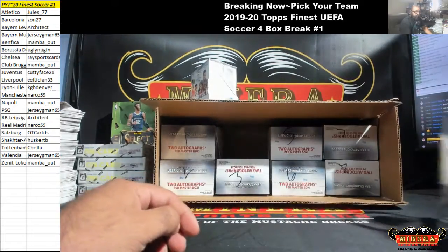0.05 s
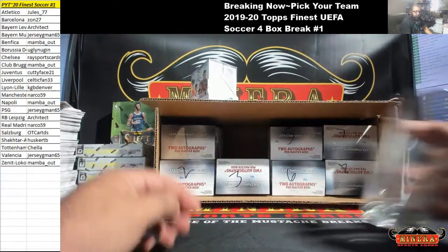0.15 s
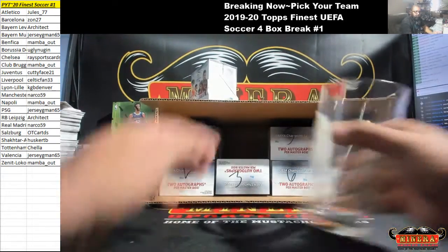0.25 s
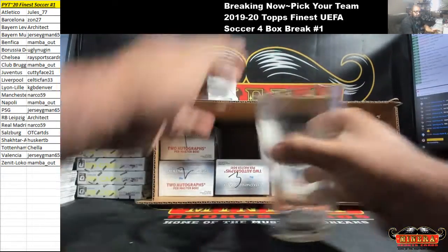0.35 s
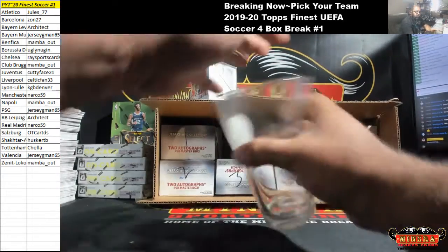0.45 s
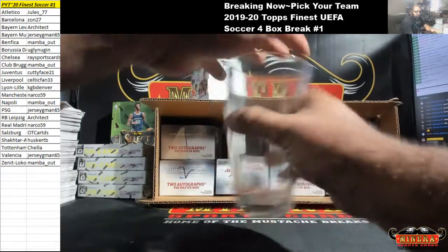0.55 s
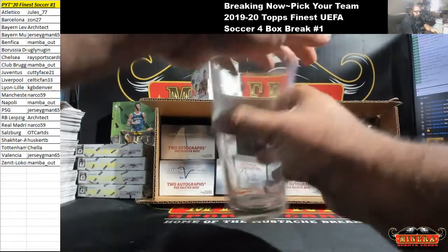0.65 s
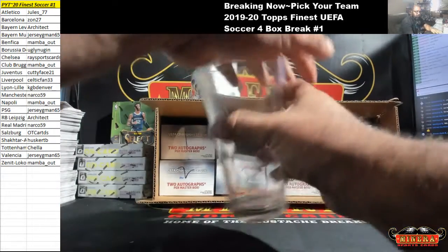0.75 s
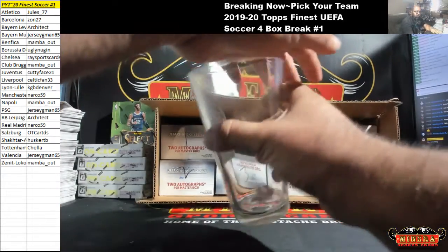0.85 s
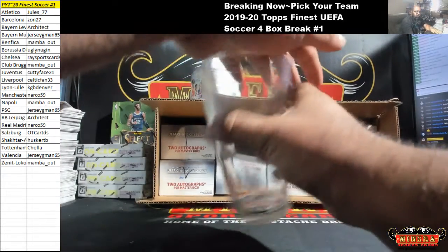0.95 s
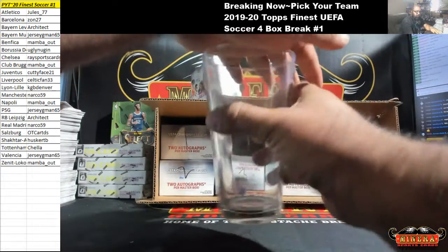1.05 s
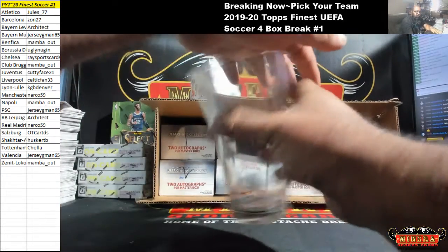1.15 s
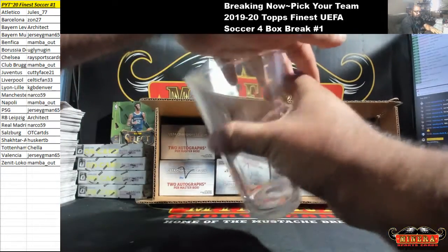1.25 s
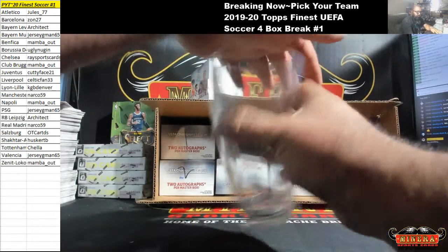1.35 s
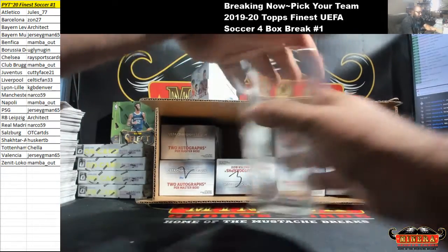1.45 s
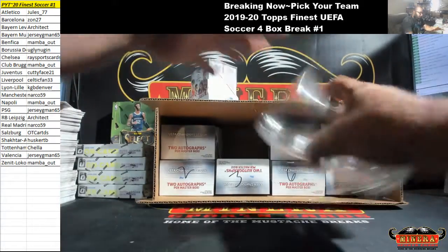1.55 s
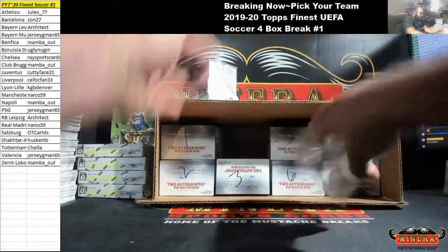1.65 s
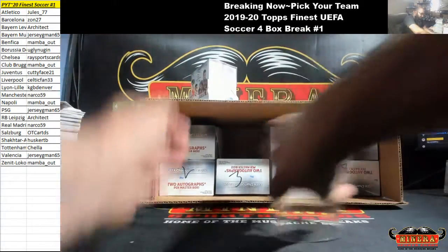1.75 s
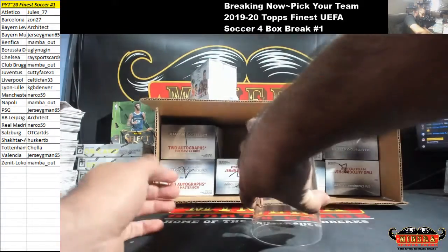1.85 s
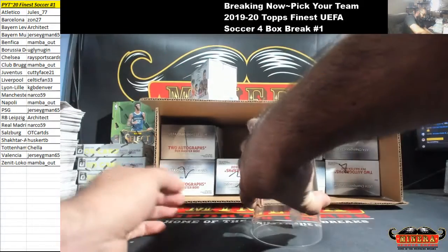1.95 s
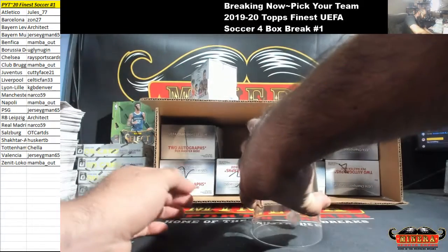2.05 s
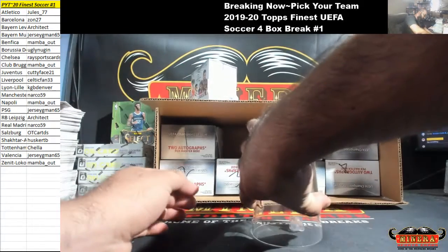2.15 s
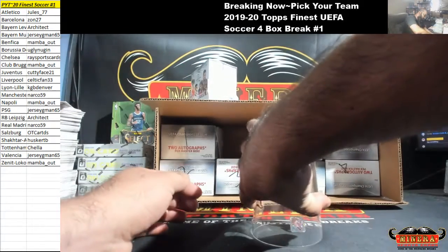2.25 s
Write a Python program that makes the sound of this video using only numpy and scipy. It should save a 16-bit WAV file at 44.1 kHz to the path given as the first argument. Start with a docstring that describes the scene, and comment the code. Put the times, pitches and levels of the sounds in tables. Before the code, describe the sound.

Rapid bright ringing rattle of a die shaken in a plastic cup, ending in a clink and thud

```python
"""Bright, glassy rings come about twenty times a second: a die shaken in a hard clear plastic cup under a palm.
Each wall hit is a cluster of decaying sines with a noise clack; dry base cracks join from 0.36 s, some in pairs.
The cup is then put down on a padded table: noise knocks, a deep sine sway of the microphone stand, and the
die bounces to rest. Rumble, hand rub, air waft and room noise are coloured noise; the small room is decaying
noise echoes."""
import sys
import numpy as np
from scipy import signal
from scipy.fft import rfft, irfft
from scipy.io import wavfile

SR = 44100
rng = np.random.default_rng(int(sys.argv[2]) if len(sys.argv) > 2 else 0)


def int16_out(signal):
    """Quantize to a 16-bit WAV file."""
    q = np.round(np.clip(np.atleast_2d(signal).T, -1, 1) * 32767)
    wavfile.write(sys.argv[1], SR, q.astype(np.int16))


N = 103635
T = np.arange(N) / SR
AGE = T[:SR // 5]   # seconds since a blow; every blow and echo is cut at 0.2 s

# Noise colours, relative within each table: hz [Hz], density_db [dB per Hz]
ROOM_NOISE = [(60,0),(130,0),(300,-13),(900,-14),(2000,-25),(5000,-42),(14000,-62)]
# Hands rubbing on the cup: hz [Hz], density_db [dB per Hz]
HANDLING = [(100,-11),(500,-17.5),(1000,-0.5),(3000,-7.5),(9000,-3),(14000,-44.5)]
# Air pushed against the microphone as the arms come down: hz [Hz], density_db [dB per Hz]
WAFT = [(11,8.5),(25,-14.5),(60,-40)]
# Loudness curve of the waft: time_s [s], level_db [dB]
WAFT_LEVEL = [(1.1,-41.5),(1.4,-14),(1.6,-21),(1.95,-12),(2.35,-32)]
# Low rumble of the table and microphone stand: hz [Hz], density_db [dB per Hz]
RUMBLE = [(30,2.5),(48,3.5),(65,0.5),(85,-22),(160,-28)]
# Loudness curve of the rumble: time_s [s], level_db [dB]
RUMBLE_LEVEL = [(0,-27),(0.14,-34.5),(0.22,-40),(0.38,-43),(0.46,-31.5),(0.75,-38),(0.98,-42),(1.24,-40),(1.6,-38),(1.85,-25.5),(2.05,-34.5),(2.35,-31)]
# Thud of a knock on the table: hz [Hz], density_db [dB per Hz]
KNOCK_COLOUR = [(40,6),(130,-2.5),(220,-4.5),(450,-14),(800,-24),(2000,-43)]
# Cup and hand knocking on the table: start_s [s], level_db [dB]
KNOCKS = [(1.722,-23.5),(1.802,-21.5),(1.956,-29.5),(2.06,-41.5)]
# Die bouncing in the cup as it lands: start_s [s], level_db [dB], lowpass_hz [Hz]
LANDINGS = [(1.7679,-28,8180),(1.7961,-3.5,15000),(1.8205,-30,9200),(1.8576,-9.5,3800),(1.9386,-17,4470)]
# Die on the base, some in close pairs: start_s [s], level_db [dB], air_hz [Hz], resonance of the part-covered cup
BASE_HITS = [(0.3645,-28,663),(0.3799,-18.5,657),(0.535,-24,669),(0.545,-20.5,643),(0.7087,-23,554),(0.8688,-27.5,578),(1.0119,-25,520),(1.1233,-22,513),(1.2443,-22,545),(1.3672,-24,610),(1.5255,-20,656),(1.6984,-20,625)]
# Die on the wall: start_s [s], then levels before the trims below:
# main_db [dB], low_db [dB], top_db [dB], contact_db [dB]
WALL_HITS = [(0.0014, -11.5, -34.5, -21, -22), (0.0945, -7, -28.5, -27.5, -22.5),
             (0.1928, -11.5, -36.5, -31, -25), (0.2332, -8, -31.5, -34, -22), (0.2603, -7.5, -42, -27, -26),
             (0.2884, -15, -37, -34, -22), (0.3157, -1.5, -29.5, -28, -23), (0.354, -4.5, -34, -28, -25),
             (0.3964, -3, -37, -56, -21.5), (0.4304, -8.5, -29, -24, -26.5),
             (0.471, -2.5, -31, -17.5, -21.5), (0.493, -4, -37.5, -18, -22.5), (0.5503,-9.5,-45,-28,-22),
             (0.5588, -12.5, -49, -30, -23.5), (0.5801, -2, -25.5, -29, -23), (0.5911, -1, -26, -27, -26),
             (0.6054, -9.5, -38, -17, -20), (0.6335, -11, -25.5, -18.5, -20.5), (0.6624, -7, -27, -29, -27),
             (0.735, -9.5, -37, -55, -27.5), (0.7818, -15, -31.5, -53, -61),
             (0.822, -6, -37.5, -20.5, -25.5), (0.8525, -3.5, -31, -63, -23),
             (0.884, -12.5, -66, -75.5, -25.5), (0.9497, -1.5, -24.5, -13.5, -17),
             (0.9893, -1, -25, -16.5, -17.5), (1.072, -4.5, -26.5, -14, -20),
             (1.1335, -7.5, -33, -69.5, -18.5), (1.1508, -10, -34, -44, -37),
             (1.2083, -12.5, -32, -50, -27.5), (1.261, -3.5, -29.5, -57.5, -23.5),
             (1.3241, -6.5, -31, -31.5, -23), (1.3468, -6, -27.5, -54.5, -28.5),
             (1.3981, -6, -29, -53.5, -23), (1.4277, -7.5, -36, -28.5, -25),
             (1.485, -11.5, -58, -45, -25.5), (1.5613, -11.5, -43, -51, -32),
             (1.6231, -8.5, -35, -60, -25.5), (1.6525, -7, -36, -74, -28),
             (1.7468, -13.5, -31.5, -38.5, -29), (1.7674, -11.5, -28, -29.5, -20.5)]
# Clack of die on wall: hz [Hz], density_db [dB per Hz]
CLACK = [(300,-8.5),(1200,-12),(2400,-6.5),(4200,3.5),(7000,2),(9000,-2),(12500,-14),(14000,-33.5)]
# Clack of die on base: hz [Hz], density_db [dB per Hz]
BASE_CLACK = [(300,-46),(1100,-31),(1800,-1),(4000,0.5),(7500,5),(11000,-6.5),(13500,-14),(16000,-29.5)]
# Held cup, low ring: pitch_hz [Hz], level_db [dB], t60_s [s]
LOW_MODES = [(2052,-2,.17),(2085,-10,.06)]
# Held cup, middle ring heard within the clack: pitch_hz [Hz], level_db [dB], t60_s [s]
MID_MODES = [(3120,-9,.04),(3690,-7,.055),(4240,-3,.05),(4520,-8,.035),(8500,0,.05)]
# Held cup, main ring: pitch_hz [Hz], level_db [dB], t60_s [s], before any length factor
MAIN_MODES = [(5480,-17,.035),(5600,-10,.05),(5706,-3,.07),(5770,-10,.022),(6090,-23,.06)]
# Held cup, top ring: pitch_hz [Hz], level_db [dB], t60_s [s]
TOP_MODES = [(11450,-6,.022),(11560,-8,.055),(12530,-4,.045),(12700,-6,.015)]
# Base of the held cup: pitch_hz [Hz], level_db [dB], t60_s [s]
BASE_MODES = [(1510,-21.5,0.042),(2950,-21.5,0.019),(7800,-12.5,0.034),(10920,-10.5,0.09),(15500,-16,0.066)]
# Cup standing on the table: pitch_hz [Hz], level_db [dB], t60_s [s], before the length factor
STANDING_MODES = [(2020,-15,.09),(2075,-11,.09),(2945,-26,.08),(4605,-7,.065),(5690,-22,.2),(7650,-15,.13),(7850,-7,.08),(8535,-12,.09),(11540,-23,.09),(11900,-23,.08),(12580,-20,.09),(13080,-21,.1)]

FLOOR_DB, HANDLING_DB, HANDLING_END_S = -51, -50.5, 1.57
SWAY_S, SWAY_HZ, SWAY_DB = 1.722, 31.86, -3.5
SWAY_RISE_S, SWAY_HOLD_S, SWAY_FALL_S = 0.048, 0.017, 0.12
KNOCK_RISE_S, KNOCK_T60_S = 0.0023, 0.12
SKITTER_PER_S, SKITTER_DB, SKITTER_END_S = 70, -27, 1.5   # mean rate of grazing touches
CLACK_T60_S, BASE_T60_S, LANDING_T60_S = 0.02, 0.027, 0.011
CRACK_DB, BASE_CRACK_DB, CRACK_T60_S = 6.5, 9.5, 0.0039   # the first instant of contact
RING_DB, MID_DB, TOP_DB, CLACK_DB = 1, -3, 0.5, 1.5   # trims on the parts of a wall hit
BASE_CLACK_DB, LANDING_CLACK_DB = -1.5, -3.5
AIR_DB, AIR_T60_S = -17, 0.08
RING_LENGTH, STANDING_LENGTH = 0.92, 0.78   # factors on ring times: cup in the hand, cup on the table
CLEAN_BLOW_SUSTAIN = 0.14   # brighter blows ring longer: dB of ring time per dB of top ring
ATTACK_S, STRIKE_SPREAD_DB = 0.00077, 2.5   # ring onset time constant; spread of mode levels
DETUNE = 0.0038   # spread of each mode's pitch from blow to blow, as a share
WAVER, WAVER_S = 0.0034, 0.0038   # share by which a ring's pitch wanders, and the time of each step
EARLY_DB, EARLY_T60_S, FIRST_ECHO_S = -10.5, 0.064, 0.0048
ROOM_DB, ROOM_T60_S, ROOM_TREBLE_T60_S, ROOM_SPLIT_HZ = -8, 0.33, 0.32, 11000
CUTOFF_HZ = 16000


def from_db(db):
    """Decibels to gain."""
    return 10 ** (np.asarray(db) / 20)


def noise(spectrum):
    """Noise of rms 1 with the given colour, falling away beyond both ends."""
    hz, db = np.transpose(spectrum)
    f = np.maximum(np.arange(N // 2 + 1) * SR / N, 1)
    colour = from_db(np.interp(np.log(f), np.log(hz), db))
    skirts = (np.minimum(f / hz[0], 1) * np.minimum(hz[-1] / f, 1)) ** 2
    x = irfft(rfft(rng.standard_normal(N)) * colour * skirts, N)
    return x / x.std()


def fade(t60):
    """Exponential decay from a blow, 60 dB in t60 seconds."""
    return np.exp((-np.log(1000) / t60 * AGE).astype("f"))


def add(out, s, sound):
    """Mix a sound in at time s."""
    i = int(np.clip(s * SR, 0, N - 1))
    out[i:i + len(sound)] += sound[:N - i]


def burst(source, t60, rise_s=0.00024):
    """A decaying snatch of noise: the many short-lived modes of a contact."""
    i = rng.integers(N - len(AGE))
    return source[i:i + len(AGE)] * fade(t60) * (1 - np.exp(-AGE / rise_s))


def ring(modes, length=1):
    """One blow: mode balance and pitch vary at random from blow to blow, and each pitch wavers."""
    hz, db, t60 = np.transpose(modes)[:, :, None]
    strength, detune = rng.standard_normal((2, len(modes), 1))
    gain = from_db(db + STRIKE_SPREAD_DB * strength)
    # The balance shifts but the summed mode power stays put
    gain = gain * np.linalg.norm(from_db(db)) / np.linalg.norm(gain)
    steps = rng.standard_normal((len(modes), 200))
    pitch = hz * (1 + DETUNE * detune + WAVER * steps)
    step_index = (AGE / WAVER_S).astype(int)
    phase = np.cumsum(np.take(2 * np.pi * pitch / SR, step_index, axis=1), axis=1)
    partials = gain.astype("f") * fade(t60 * length) * np.sin(phase.astype("f"))
    return np.sum(partials, axis=0) * (1 - np.exp(-AGE / ATTACK_S))


def background():
    """Room noise, the soft rub of hands on the cup until it is put down, and the waft of the arms."""
    floor = from_db(FLOOR_DB) * noise(ROOM_NOISE)
    moving = np.interp(T, [HANDLING_END_S, HANDLING_END_S + 0.1], [1, 0])
    rub = from_db(HANDLING_DB) * moving * noise(HANDLING)
    waft = from_db(np.interp(T, *np.transpose(WAFT_LEVEL))) * noise(WAFT)
    return floor + rub + waft


def table_and_stand():
    """Dull knocks, a few deep swings of the microphone stand, and rumble from the moving arms."""
    out, thud = np.zeros(N), noise(KNOCK_COLOUR)
    for s, db in KNOCKS:
        add(out, s, from_db(db) * burst(thud, KNOCK_T60_S, KNOCK_RISE_S))
    corners = np.cumsum([0, SWAY_RISE_S, SWAY_HOLD_S, SWAY_FALL_S])
    swell = np.sin(np.pi / 2 * np.interp(AGE, corners, [0, 1, 1, 0])) ** 2
    add(out, SWAY_S, from_db(SWAY_DB) * swell * np.sin(2 * np.pi * SWAY_HZ * AGE))
    rumble = from_db(np.interp(T, *np.transpose(RUMBLE_LEVEL))) * noise(RUMBLE)
    return out + rumble


def skitter(spread_db=4, clack_db=-5):
    """Light touches of random time and level as the die tumbles along the wall."""
    out, clack = np.zeros(N), noise(CLACK)
    draws = rng.random((200, 2))
    starts = np.cumsum(2 * draws[:, 0]) / SKITTER_PER_S
    sizes = 2 * draws[:, 1] - 1
    for s, size in zip(starts, sizes):
        if s < SKITTER_END_S:
            touch = ring(MAIN_MODES) + from_db(clack_db) * burst(clack, BASE_T60_S)
            add(out, s, from_db(SKITTER_DB + spread_db * size) * touch)
    return out


def landing():
    """The die bounces as the cup lands, one hard clink standing out; a lowpass dulls the last two bounces most."""
    out, clack = np.zeros(N), noise(CLACK)
    for s, db, lowpass_hz in LANDINGS:
        contact = from_db(LANDING_CLACK_DB) * burst(clack, LANDING_T60_S)
        blow = ring(STANDING_MODES, STANDING_LENGTH) + contact
        b, a = signal.butter(2, lowpass_hz, fs=SR)
        add(out, s, from_db(db) * signal.lfilter(b, a, blow))
    return out


def base_hits():
    """The stiff base gives a dry crack and stirs the air in the cup, a decaying sine."""
    out, clack = np.zeros(N), noise(BASE_CLACK)
    for s, db, air_hz in BASE_HITS:
        air = from_db(AIR_DB) * fade(AIR_T60_S) * np.sin(2 * np.pi * air_hz * AGE)
        body = from_db(BASE_CLACK_DB) * burst(clack, BASE_T60_S)
        crack = from_db(BASE_CRACK_DB) * burst(clack, CRACK_T60_S)
        add(out, s, from_db(db) * (ring(BASE_MODES) + body + crack + air))
    return out


def wall_hits():
    """The die strikes the wall: a crack, a short clack and a bright ring."""
    out, clack = np.zeros(N), noise(CLACK)
    mean_top_db = np.mean(WALL_HITS, axis=0)[3]
    for s, main_db, low_db, top_db, contact_db in WALL_HITS:
        length = RING_LENGTH * from_db(CLEAN_BLOW_SUSTAIN * (top_db - mean_top_db))
        main = from_db(main_db + RING_DB) * ring(MAIN_MODES, length)
        low = from_db(low_db) * ring(LOW_MODES)
        top = from_db(top_db + TOP_DB) * ring(TOP_MODES)
        middle = from_db(MID_DB) * ring(MID_MODES)
        body = from_db(CLACK_DB) * burst(clack, CLACK_T60_S)
        crack = from_db(CRACK_DB) * burst(clack, CRACK_T60_S)
        add(out, s, main + low + top + from_db(contact_db) * (middle + body + crack))
    return out


def room(x):
    """Close reflections from the table and boxes, then a short tail whose extreme treble dies slightly faster."""
    near, far = rng.standard_normal((2, len(AGE))) * (AGE > FIRST_ECHO_S)
    lowpass = signal.butter(2, ROOM_SPLIT_HZ, fs=SR, output="sos")
    highpass = signal.butter(2, ROOM_SPLIT_HZ, "high", fs=SR, output="sos")
    dull = signal.sosfilt(lowpass, far)
    bright = signal.sosfilt(highpass, far[::-1])   # reversed noise, so the treble tail starts at once
    early = near * fade(EARLY_T60_S)
    tail = dull * fade(ROOM_T60_S) + bright * fade(ROOM_TREBLE_T60_S)
    echoes = from_db(EARLY_DB) * early / np.linalg.norm(early)
    echoes = echoes + from_db(ROOM_DB) * tail / np.linalg.norm(tail)
    return x + signal.fftconvolve(x, echoes)[:N]


def scene():
    """Cup and die in the room, over the table, the stand and the background."""
    low = background() + table_and_stand()
    cup = skitter() + landing() + base_hits() + wall_hits()
    return (low + room(cup))[None]


def record(dry):
    """Peaks beyond full scale clip; a steep lowpass then cuts the top."""
    # 70 dB down from 900 Hz above the cutoff
    lowpass = signal.cheby2(12, 70, CUTOFF_HZ + 900, fs=SR, output="sos")
    return signal.sosfilt(lowpass, np.clip(dry, -1, 1))


dry = scene()
out = record(dry)
int16_out(out)
```